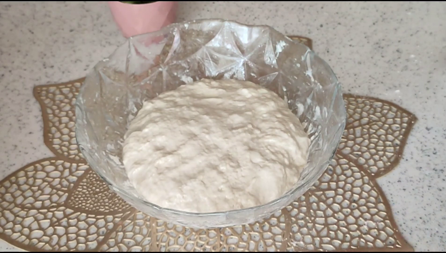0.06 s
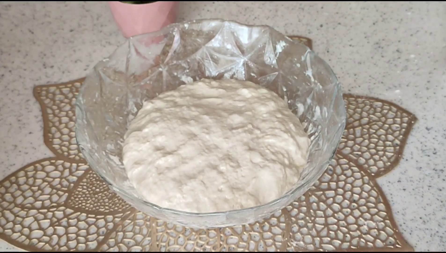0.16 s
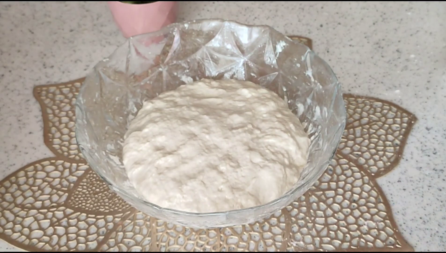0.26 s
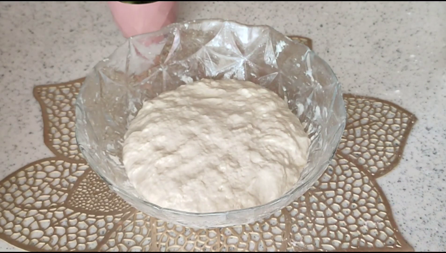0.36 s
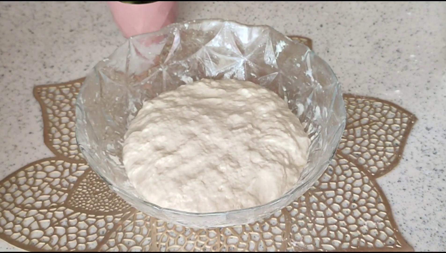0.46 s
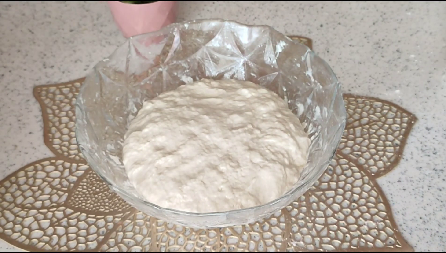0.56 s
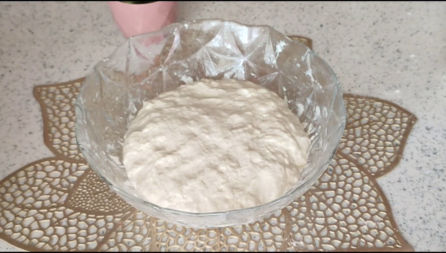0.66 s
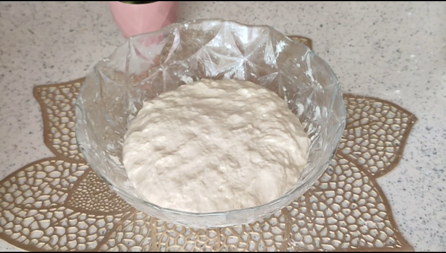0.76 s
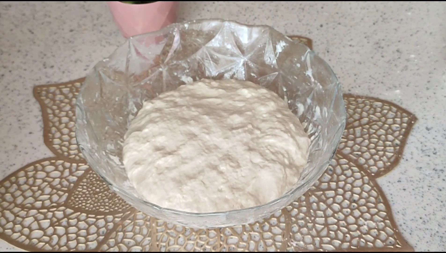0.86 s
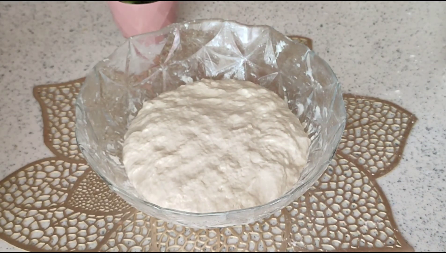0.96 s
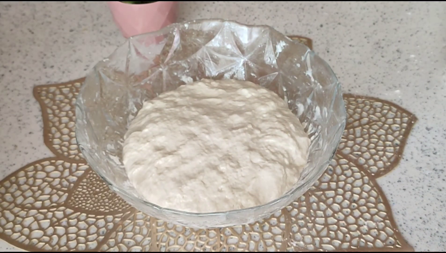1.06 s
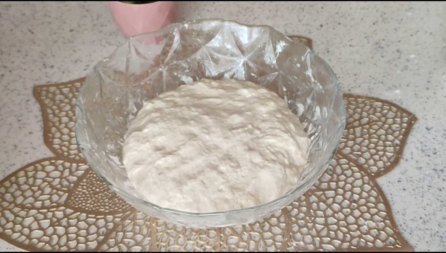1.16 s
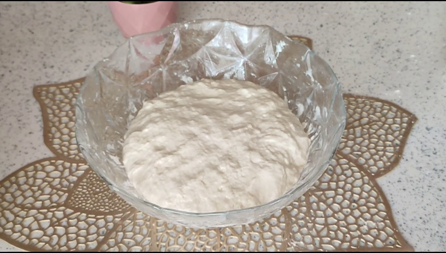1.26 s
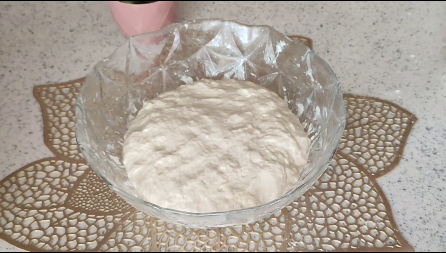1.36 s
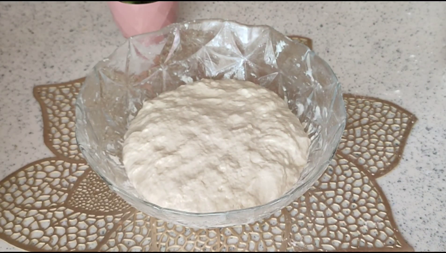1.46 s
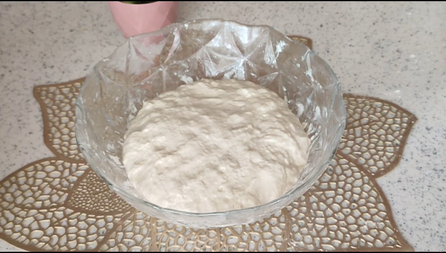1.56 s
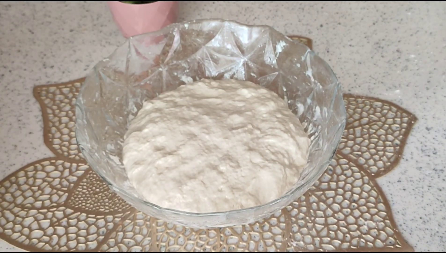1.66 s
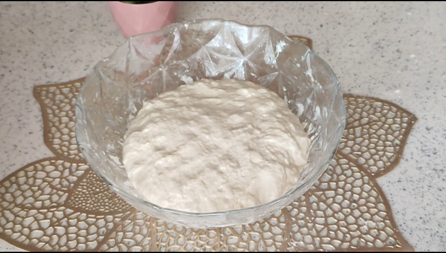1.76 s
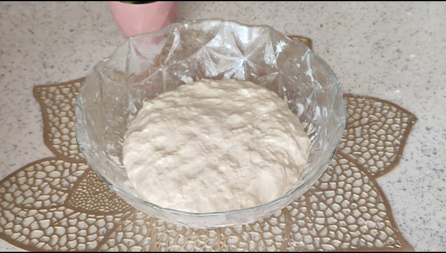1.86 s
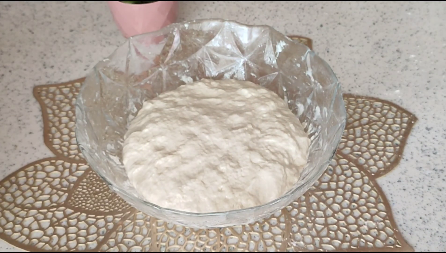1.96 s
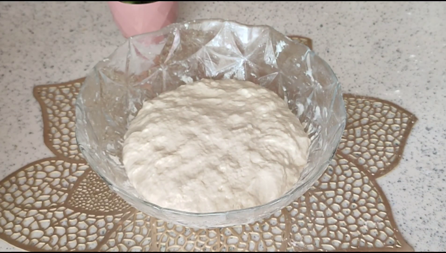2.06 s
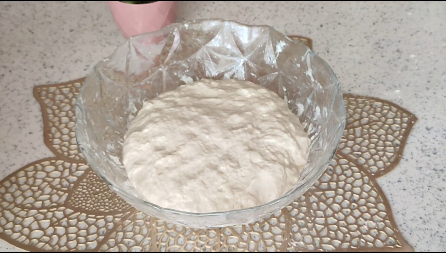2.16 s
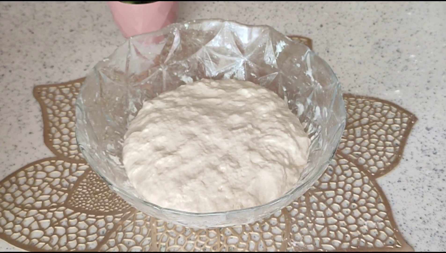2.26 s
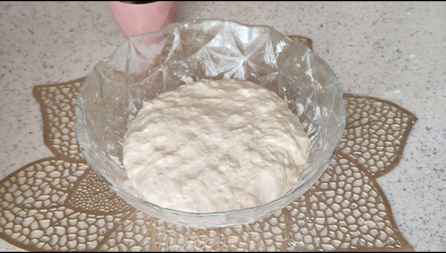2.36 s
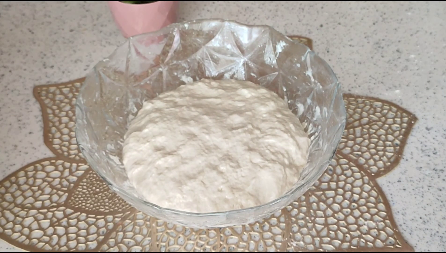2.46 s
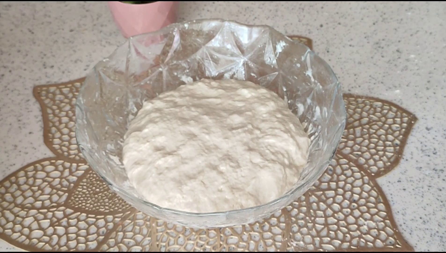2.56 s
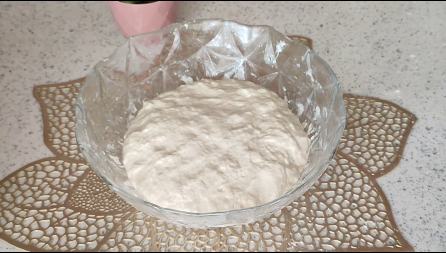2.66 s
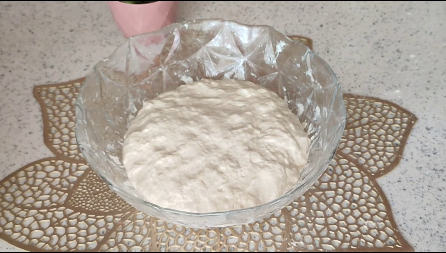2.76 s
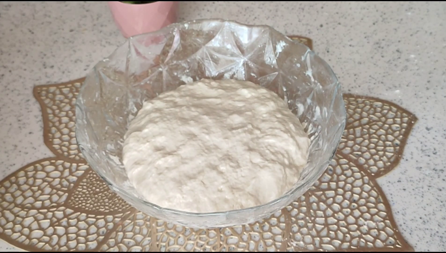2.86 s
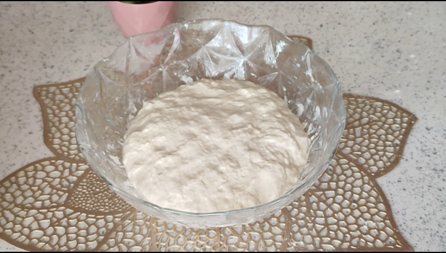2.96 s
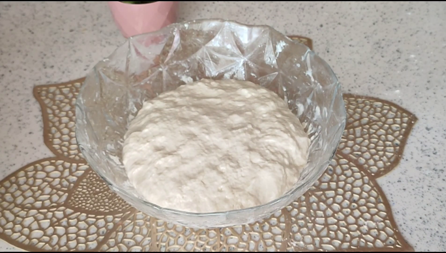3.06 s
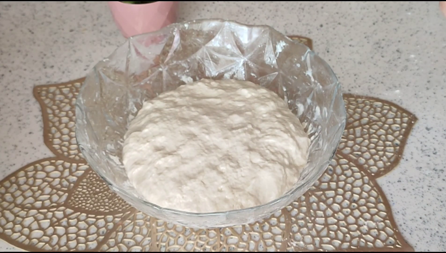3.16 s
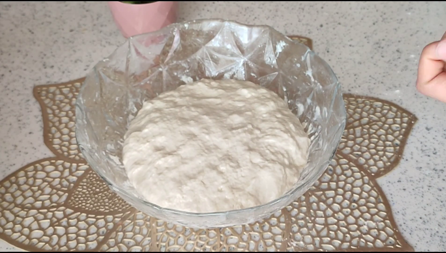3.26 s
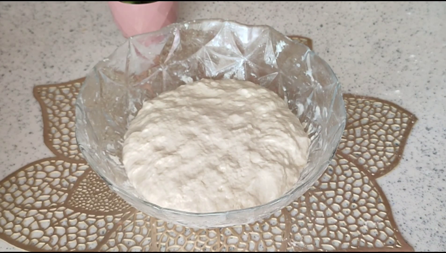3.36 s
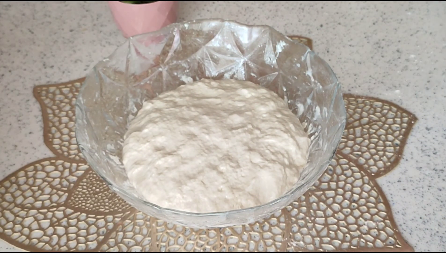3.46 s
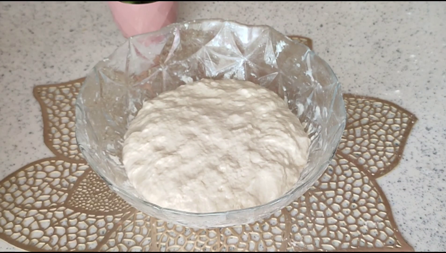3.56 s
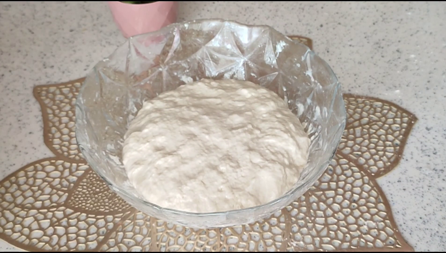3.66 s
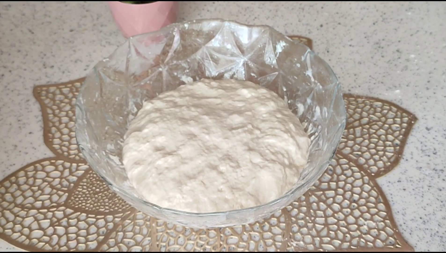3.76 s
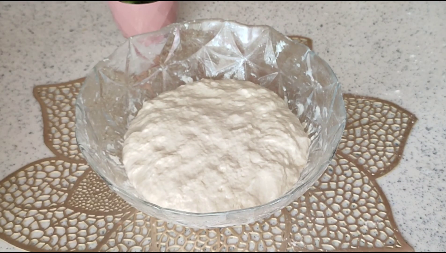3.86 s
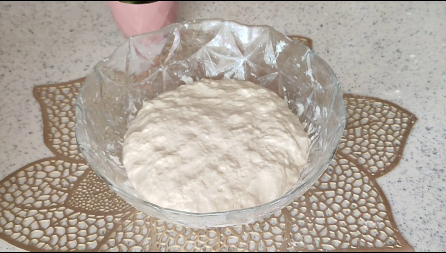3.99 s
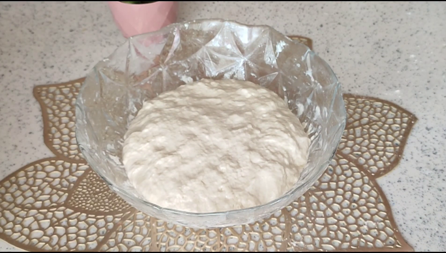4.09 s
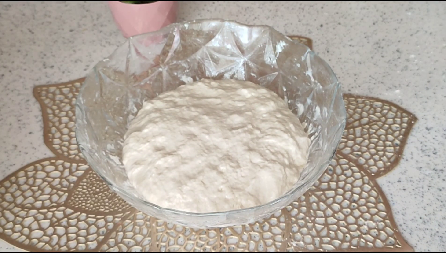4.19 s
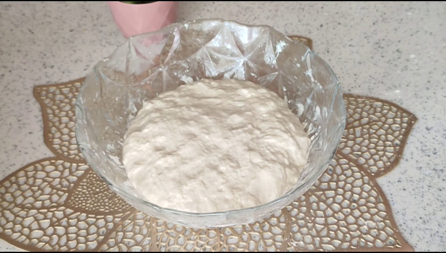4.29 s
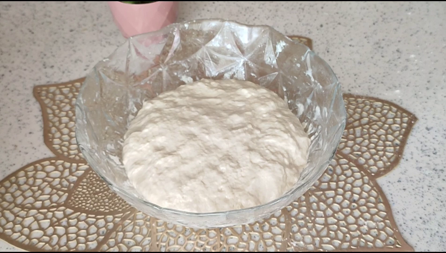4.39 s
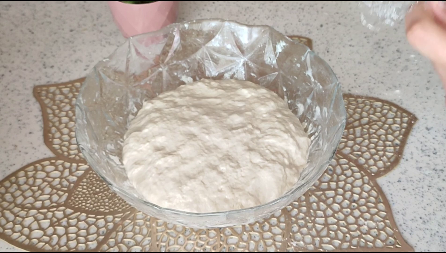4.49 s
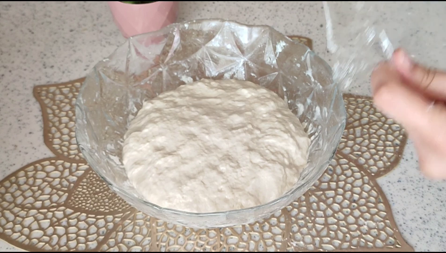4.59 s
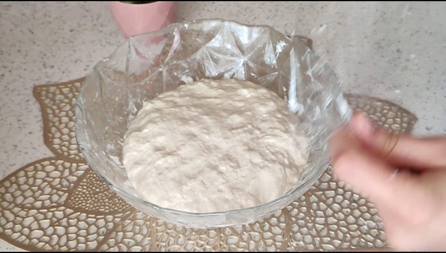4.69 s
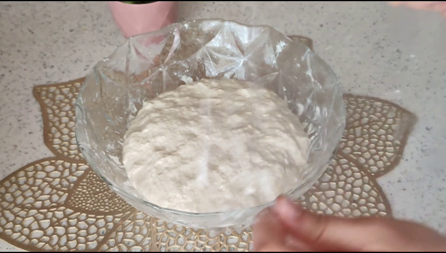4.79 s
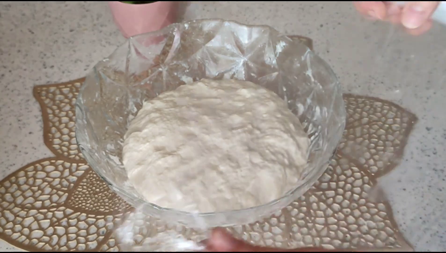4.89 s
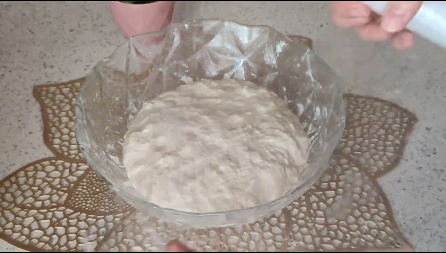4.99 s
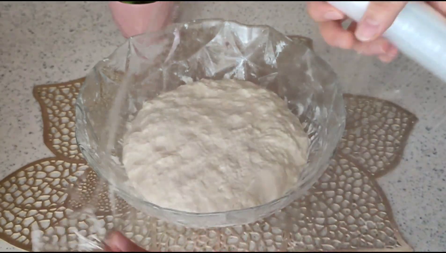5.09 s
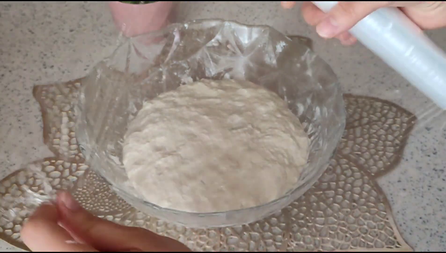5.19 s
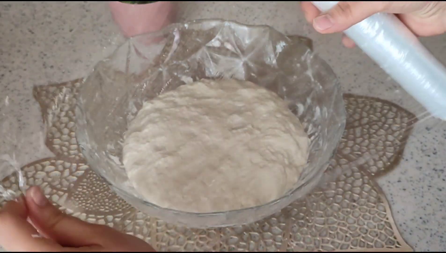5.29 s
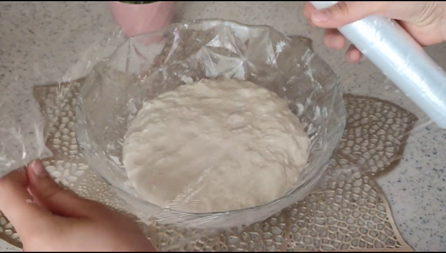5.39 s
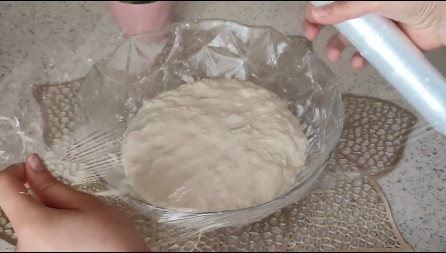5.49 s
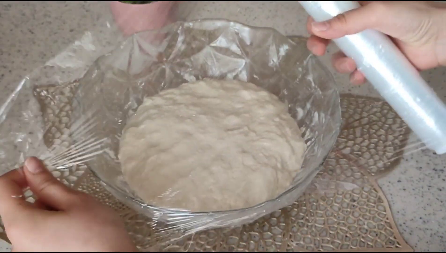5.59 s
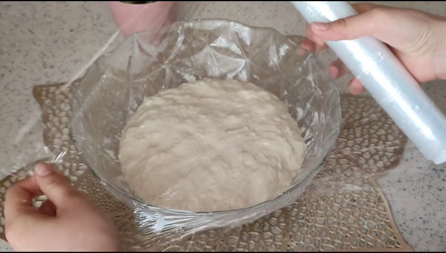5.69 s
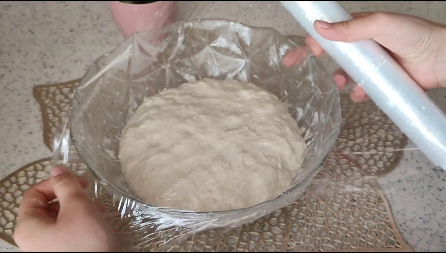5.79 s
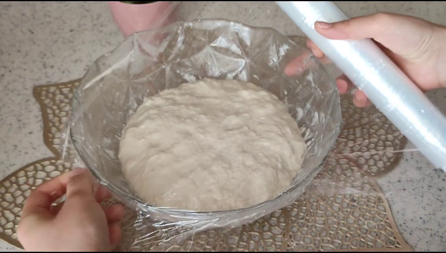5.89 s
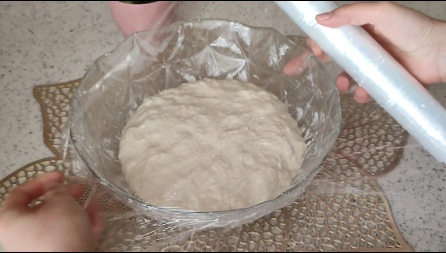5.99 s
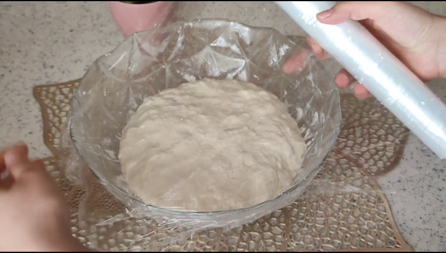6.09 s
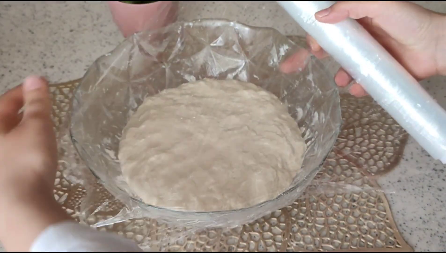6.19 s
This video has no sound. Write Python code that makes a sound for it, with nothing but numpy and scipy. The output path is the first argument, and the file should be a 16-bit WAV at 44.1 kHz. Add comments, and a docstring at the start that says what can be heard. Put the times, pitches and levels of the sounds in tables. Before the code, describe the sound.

After faint ticks and finger rubbing, cling film peels off a roll in loud, crackling pulls close by, over a low kitchen hum.

```python
"""Cling film, picked loose from its roll and drawn over a glass bowl; stereo pair in a quiet kitchen.
It starts off to the right and moves in close, above the bowl. The peeling edge lets go in thousands of
tiny snaps a second, which the taut sheet radiates; at times it rips, judders or pops. Fingers rub and
squeak, creases tick, the roll shudders in the hand, and the touched bowl rings once.
Behind it are short room echoes, a low rumble and the hum of an appliance."""
import sys
import numpy as np
from scipy import signal
from scipy.fft import rfft, irfft, next_fast_len
from scipy.io import wavfile
from scipy.ndimage import uniform_filter1d

SR = 44100
rng = np.random.default_rng(int(sys.argv[2]) if len(sys.argv) > 2 else 0)


def wav_record(signal):
    """Record a signal, one row per channel, as 16-bit PCM in the file named by sys.argv[1]."""
    frames = np.transpose(np.atleast_2d(signal))
    bounded = np.clip(frames, -1, 1)
    # unit amplitude maps onto the largest positive 16-bit level
    quanta = np.round(bounded * 32767).astype(np.int16)
    wavfile.write(sys.argv[1], SR, quanta)


N = 274962
TIME = np.arange(N) / SR

# Room tone spectrum: f/Hz, gain/dB
ROOM_TONE = [(12, -0.5), (28, -3), (55, -6.5), (76, -14), (104, -9.5), (128, -16.5), (166, -14.5),
             (205, -17), (320, -21), (450, -25.5), (740, -28.5), (920, -34), (1800, -36.5), (4600, -45),
             (9600, -50), (11500, -56)]
# Stereo width of the room tone: f/Hz, side minus mid/dB
ROOM_TONE_WIDTH = [(60, -10.5), (110, -16.5), (190, -11.5), (350, -7.5), (630, -3.5), (1130, -1),
                   (2040, -3.5), (3680, -2.5), (6620, -2.5), (11900, -2)]
# Appliance hum: f/Hz, level/dB
HUM = [(101, -59), (167, -67)]
# Kitchen reverberation: f/Hz, T60/s
KITCHEN_T60 = [(200, 0.94), (530, 0.32), (1400, 0.31), (3700, 0.27), (9700, 0.16)]
# Colour difference between the microphones: f/Hz, left minus right/dB
MIC_BALANCE = [(150, 0), (300, 0.5), (480, -6), (800, 1), (1500, 0), (3500, -0.3), (5500, -1), (7500, -4),
               (8800, 2), (11000, 0)]
# The film's path, from the right of the table (0) towards the microphones (1): t/s, nearness
NEARNESS = [(0, 0), (3.3, 0.3), (4.1, 0.41), (4.5, 0.73), (5.5, 0.66)]
# Stereo width of the film and its echoes: f/Hz, side minus mid/dB
FILM_WIDTH = [(150, -14.5), (300, -28), (500, -8.5), (750, -4.5), (1200, -2.5), (1600, -0.5), (11000, 1)]

# Modes of the glass bowl: f/Hz, gain/dB, T60/s
GLASS_MODES = [(894, 1, 0.15), (2380, -5, .07), (4360, 2.5, 0.066), (5540, -4, 0.052)]
# Air resonances in the bowl, under the sheet: f/Hz, bandwidth/Hz, gain/dB
BOWL_AIR = [(268, 6.3, 3.5), (310, 110, -5), (492, 10, 0), (661, 170, -13), (930, 120, -1.5), (1187, 73, 0),
            (1880, 15, 1), (3614, 25, 0.5)]
# Spectrum of a flipping crease: f/Hz, gain/dB
CREASE_COLOUR = [(600, -2), (1500, -7), (3000, -3), (4600, -3), (6000, 1.5), (8000, -4), (10500, -9.5),
                 (12000, -28)]
# Spectrum of the short flap at the roll: f/Hz, gain/dB
FLAP_COLOUR = [(100, -13), (180, -5.5), (250, -1.5), (370, -8.5), (520, -9.5), (750, -5), (1100, -5.5),
               (1750, -6.5), (2450, -2), (3100, -7), (3900, -4.5), (5200, -6), (7300, -3), (10000, -6.5),
               (12000, -21.5)]
# Spectrum of the wide sheet: f/Hz, gain/dB
SHEET_COLOUR = [(100, -1), (160, 1), (260, -6.5), (360, -4.5), (450, 1.5), (800, 1), (1050, -3),
                (1450, 1.5), (2400, -6), (3200, -8.5), (5200, -7), (7400, -5), (8800, -14.5), (10600, -8.5),
                (12000, -22.5)]

# Event levels below are relative, taken before the room and the microphones.
# A hand touches the bowl: t/s, level/dB
TOUCHES = [(5.955, -52.5)]
# Faint rising finger squeaks: middle t/s, length/s, f/Hz, level/dB
SQUEAKS = [(.205, 0.076, 1480, -61.5), (.27, .13, 1730, -65)]
# Low shudders of the roll and the hands on it: middle t/s, length/s, f/Hz, level/dB
SHUDDERS = [(2.54, .083, 170.5, -41), (4.18, .06, 134, -39.5), (4.265, 0.0873, 103.2, -34),
            (4.345, 0.1, 109, -42.5), (4.45, 0.095, 125.3, -42), (4.61, 0.057, 93, -50),
            (5.275, 0.09, 160.7, -36.5), (5.36, 0.14, 158, -40), (5.64, .11, 77, -45.5),
            (5.9, .44, 58.4, -52.5)]
# Judders and rasps of the sheet: middle t/s, length/s, f/Hz, level/dB
JUDDERS = [(1.895, .06, 960, -49), (3.311, .02, 1390, -45), (4.11, .054, 936, -32),
           (4.522, .05, 466, -33.5), (4.577, .032, 530, -25.5), (4.597, .028, 1410, -33),
           (4.6, 0.041, 262, -38), (4.65, 0.08, 314, -35.5), (4.661, .032, 680, -28.5),
           (4.78, .057, 797, -32.5), (4.974, 0.063, 438, -24.5), (5.005, 0.051, 322, -45.5),
           (5.015, .044, 729.5, -27.5), (5.165, .061, 5300, -32), (5.425, .055, 4230, -29),
           (5.447, .042, 302, -29), (5.463, 0.08, 507, -25), (5.53, .095, 278.6, -36.5)]
# Creases flip over: t/s, level/dB
TICKS = [(0.4913, -23.5), (0.918, -32), (0.9646, -32), (1.1376, -29), (1.2, -25), (1.259, -29.5),
         (1.286, -27.5), (5.954, -26)]
# Stuck patches rip free: t/s, level/dB
RIPS = [(2.501, -19), (3.2255, -31), (3.277, -24), (3.301, -26), (3.3075, -19.5), (4.171, -21),
        (4.3803, -11.5), (4.901, -18), (5.1355, -18), (5.244, -11.5), (5.2797, -20), (5.3225, -14),
        (5.5972, -12), (5.9184, -32.5), (6.1225, -35.5)]
# Wide strips let go at once: t/s, level/dB
POPS = [(4.253, -15), (4.587, -11), (5.447, -18), (5.461, -14.5), (5.491, -12), (5.639, -14),
        (5.666, -11.5)]
# Fingers rub over the film: middle t/s, length/s, level/dB
RUBS = [(1.644, 0.27, -72), (1.777, 0.093, -58), (1.885, 0.095, -47.5), (1.925, 0.42, -65),
        (2.089, 0.19, -64.5), (2.323, 0.61, -64), (2.477, 0.44, -58.5), (2.566, 0.14, -51),
        (2.654, .28, -61), (3.152, 0.14, -51.5), (3.208, 0.59, -62), (3.293, .08, -55.5),
        (3.496, 0.18, -66.5), (3.61, 0.15, -65), (3.768, 0.096, -62.5), (3.883, 0.57, -65.5),
        (5.913, 0.088, -59), (6.03, 0.71, -69.5), (6.131, 0.017, -62)]
# The slack sheet rustles around the pulls: start t/s, end t/s, level/dB
SLACK = [(4.054, 4.904, -48.5), (4.867, 5.114, -50.5), (5.135, 5.785, -48.5)]
# Pulls off the roll: start t/s, end t/s, attack/s, edge level/dB, creases re edge/dB, sheet re edge/dB
PULLS = [(2.498, 2.56, 0.022, -34, 0.5, -1.5), (4.043, 4.117, 0.012, -41, 5, -7),
         (4.09, 4.152, 0.018, -30, 1.5, -10), (4.162, 4.349, .003, -30.5, 0.55, -1),
         (4.377, 4.452, 0.0024, -31, 1.5, -6.5), (4.441, 4.554, 0.015, -28.5, 1.5, 2.5),
         (4.56, 4.679, 0.0082, -30, 2, .5), (4.716, 4.855, 0.015, -38.5, 5.5, 5.5),
         (4.925, 5.059, 0.045, -32.5, 3, 3.5), (5.134, 5.213, 0.0029, -32.5, 1, 3.5),
         (5.246, 5.291, 0.0048, -32, -0.5, 4), (5.319, 5.435, .006, -32, 1.5, 4.5),
         (5.399, 5.547, 0.044, -30, -0.5, 0.5), (5.602, 5.713, 0.0032, -33.5, 3, 6.5)]


def from_db(db):
    """Decibels to gain."""
    return 10 ** (np.asarray(db) / 20)


def at_hz(points, hz):
    """Read a table on a log-frequency axis."""
    freq, value = np.transpose(points)
    return np.interp(np.log(np.maximum(hz, 1)), np.log(np.maximum(freq, 1)), value)


def band(x, low_hz, high_hz, order=3):
    """Butterworth band-pass."""
    return signal.sosfilt(signal.butter(order, [low_hz, high_hz], "band", fs=SR, output="sos"), x + 1e-18)


def colour(x, points):
    """Minimum-phase filter that follows a table of f/Hz, gain/dB."""
    size = 2 * next_fast_len(N // 2 + SR // 10)
    gain = from_db(at_hz(points, np.fft.rfftfreq(size, 1 / SR)))
    cepstrum = irfft(np.log(gain))
    cepstrum[1:size // 2] *= 2
    cepstrum[size // 2 + 1:] = 0
    return irfft(rfft(x, size) * np.exp(rfft(cepstrum)))[..., :N]


def resonance(x, hz, width_hz):
    """Two-pole resonance with a peak gain of 1."""
    radius = np.exp(-np.pi * width_hz / SR)
    feedback = [1, -2 * radius * np.cos(2 * np.pi * hz / SR), radius ** 2]
    return signal.lfilter(np.array([1, 0, -1]) * (1 - radius ** 2) / 2, feedback, x + 1e-18)


def drift(per_s, time=TIME):
    """Smooth random wandering with spread 1."""
    knots = rng.standard_normal(N // 10)
    return np.interp(time * per_s, np.arange(len(knots)), knots) * np.sqrt(3 / 2)


def spread(pair, width):
    """Left and right from a mid and a side signal, the side shaped by the width table."""
    return pair[0] + colour(pair[1], width) * [[1], [-1]]


def steady(x, span_s):
    """Even out the slow swells of a stereo texture and keep its grain; the mid has power 1."""
    power = uniform_filter1d(x.mean(0) ** 2, int(span_s * SR))
    return x / np.sqrt(np.maximum(power, 0) + 1e-20)


def clicks(rows):
    """One impulse for each row of t/s, level/dB."""
    times, db = np.transpose(rows)
    return np.bincount((times * SR).astype(int), from_db(db), N)[:N]


def arch(start_s, end_s):
    """Half a sine from start to end, zero outside."""
    return np.sin(np.pi * np.clip((TIME - start_s) / (end_s - start_s), 0, 1))


def held(start_s, end_s, attack_s, fade_db_per_s):
    """Attack, hold, and a steady decay after the end."""
    attack = np.clip((TIME - start_s) / attack_s, 0, 1)
    return attack * from_db(-fade_db_per_s * np.clip(TIME - end_s, 0, 1))


def room_tone(level_db=-51.5):
    """The low rumble of the quiet kitchen."""
    air = colour(spread(rng.standard_normal((2, N)), ROOM_TONE_WIDTH), ROOM_TONE)
    return from_db(level_db) * air / np.sqrt(np.mean(air ** 2))


def appliance(waver=0.19):
    """A background hum, centred between the microphones, wavering in phase and level."""
    hum = 0
    for hz, db in HUM:
        tone = np.sqrt(2) * np.sin(2 * np.pi * hz * TIME + waver * drift(5.2))
        hum = hum + from_db(db) * tone * (1 + waver * drift(6.1))
    return hum


def kitchen(direct, nearness, wet_db=-13, far_db=5.5, gap_s=0.0016):
    """A small hard room adds diffuse echoes: duller as they die, stronger when the film is far off."""
    age = np.arange(SR // 2) / SR
    edges_hz = np.geomspace(90, 14000, num=8)
    tail = 0
    for low, high in zip(edges_hz, edges_hz[1:]):
        decay = from_db(-60 * age / at_hz(KITCHEN_T60, np.sqrt(low * high)))
        tail = tail + band(rng.standard_normal((2, len(age))), low, high, order=2) * decay
    tail *= np.clip(age / gap_s - 1, 0, 1)
    tail /= np.sqrt(np.sum(tail ** 2))
    send = direct * from_db(wet_db + far_db * (1 - nearness))
    echoes = signal.fftconvolve(send, tail, axes=1)[:, :N]
    return direct + spread(echoes, FILM_WIDTH)


def microphones(pair, nearness, lag_s=0.00014, off_centre_db=2.5):
    """Sound from the right reaches the left microphone later and weaker; each has its own colour."""
    aside = 1 - nearness
    left = np.interp(TIME - lag_s * aside, TIME, pair[0]) * from_db(-off_centre_db * aside / 2)
    right = pair[1] * from_db(off_centre_db * aside / 2)
    return np.array([colour(left, [(hz, db / 2) for hz, db in MIC_BALANCE]),
                     colour(right, [(hz, -db / 2) for hz, db in MIC_BALANCE])])


def glass_bowl():
    """The touched bowl rings lightly, damped by the dough inside."""
    age = np.arange(SR // 2) / SR
    ring = sum(from_db(db - 60 * age / t60) * np.sin(2 * np.pi * hz * age) for hz, db, t60 in GLASS_MODES)
    return signal.fftconvolve(clicks(TOUCHES), ring)[:N]


def stick_slip(rows, glide_octaves, jitter, overtone_db, rough_db, jitter_cycles=1.6):
    """The film grips and slips almost regularly: short swelling tones that glide as tension changes."""
    out = np.zeros(N)
    for middle, length, hz, db in rows:
        on = np.abs(TIME - middle) < length / 2
        age = TIME[on] - middle + length / 2
        wander = 1 + jitter * drift(hz / jitter_cycles, age)
        grip = from_db(db + rough_db * drift(hz / 4, age))
        glide = 2 ** (glide_octaves * (age / length - 0.5))
        phase = 2 * np.pi * np.cumsum(hz * glide * wander) / SR
        wave = np.sin(phase) + from_db(overtone_db) * np.sin(2 * phase)
        out[on] += grip * np.sin(np.pi * age / length) * wave
    return out


def cracks(rows, spectrum, gain_db, shiver_s, shiver_db):
    """Film gives way with a sharp tick and a few milliseconds of shiver."""
    age = np.arange(SR // 10) / SR
    crack = from_db(shiver_db) * rng.standard_normal((2, len(age))) * np.exp(-age / shiver_s)
    crack[:, 0] = 1  # the tick
    train = signal.fftconvolve(clicks(rows)[None], crack, axes=1)[:, :N]
    return from_db(gain_db) * colour(train, spectrum)


def pops(hz=680, width_hz=800, gain_db=24):
    """A strip that lets go jerks the taut sheet through one heavily damped swing."""
    swing = resonance(clicks(POPS), hz, width_hz)
    return from_db(gain_db) * resonance(swing, hz, 2 * width_hz)


def handling(swell_db=3.5):
    """How hard the hands drive edge, creases and sheet; pulls, slack rustle and rubs add in power."""
    def shares(envelope, creases_db, sheet_db):
        return np.outer(from_db([0, creases_db, sheet_db]), envelope) ** 2

    power = np.zeros((3, N))
    for start, end, attack_s, db, creases_db, sheet_db in PULLS:
        # a pull swells as the arm speeds up and dies away when it stops
        swell = from_db(db + swell_db * (arch(start, end) - 1))
        power += shares(swell * held(start, end, attack_s, fade_db_per_s=520), creases_db, sheet_db)
    for start, end, db in SLACK:
        rustle = from_db(db) * held(start, end, attack_s=0.021, fade_db_per_s=230)
        power += shares(rustle, creases_db=3.5, sheet_db=6.5)
    for middle, length, db in RUBS:
        stroke = from_db(db) * arch(middle - length / 2, middle + length / 2) ** 2
        power += shares(stroke, creases_db=-3, sheet_db=-4.5)
    return np.sqrt(power)


def wrinkles(crackle, q=16, flare_db=6.5, flare_per_s=40, gain_db=-6.5):
    """Wrinkles form and flatten as the tension shifts; each rings for a moment at its own pitch."""
    out = crackle
    for hz in np.geomspace(400, 10000, num=30):
        flare = from_db(gain_db + flare_db * np.minimum(drift(flare_per_s), 2))
        out = out + flare * resonance(crackle, hz, hz / q)
    return out


def snaps(per_s, uneven_db=1.0):
    """Random snaps of uneven size; each reaches the two microphones in its own way."""
    chance = np.clip(per_s / SR, 1e-4, 1)
    sizes = from_db(uneven_db * np.minimum(rng.exponential(1, N), 4))
    impulses = sizes * (rng.random(N) < chance) / np.sqrt(chance)
    return spread(impulses * rng.choice([-1, 1], (2, N)), FILM_WIDTH)


def peeling(nearness, top_snaps_per_s=6000, catch_db=0.5, catch_per_s=170):
    """A faster pull frees more snaps a second; edge, creases and sheet radiate them, treble to bass."""
    edge, creases, sheet = handling()
    snapping = snaps(top_snaps_per_s * (edge / edge.max()) ** 0.27)
    catching = from_db(catch_db * drift(catch_per_s))  # the edge catches and runs on
    crackle = wrinkles(snapping * catching)
    # the flap at the roll sounds thin; the wide sheet is fuller and rings the air in the bowl
    flap = colour(crackle, FLAP_COLOUR)
    wide = colour(crackle, SHEET_COLOUR)
    bowl_air = sum(from_db(db) * resonance(wide, hz, width) for hz, width, db in BOWL_AIR)
    film = (1 - nearness) * flap + nearness * (wide + bowl_air)
    sizzle = from_db(-1.2) * edge * steady(band(film, 3260, 11700), span_s=0.13)
    rustle = from_db(-0.42) * creases * steady(band(film, 850, 3390), span_s=0.027)
    drumming = from_db(-3.5) * sheet * steady(band(film, 156, 1000), span_s=0.075)
    return sizzle + rustle + drumming


def scene():
    """The film is picked loose to the right of the microphones, then drawn closer, over the bowl."""
    nearness = np.interp(TIME, *np.transpose(NEARNESS))
    direct = peeling(nearness) + pops() + glass_bowl()
    direct += cracks(TICKS, CREASE_COLOUR, gain_db=-1, shiver_s=0.0044, shiver_db=-18.5)
    direct += cracks(RIPS, FLAP_COLOUR, gain_db=6.5, shiver_s=0.0037, shiver_db=-13)
    direct += stick_slip(JUDDERS, glide_octaves=-0.069, jitter=0.072, overtone_db=-7, rough_db=2)
    direct += stick_slip(SHUDDERS, glide_octaves=-0.0015, jitter=0.08, overtone_db=-29, rough_db=4.5)
    direct += stick_slip(SQUEAKS, glide_octaves=0.216, jitter=0.058, overtone_db=-10, rough_db=4)
    return microphones(kitchen(direct, nearness), nearness) + room_tone() + appliance()


def record(dry):
    """A steep low-pass cuts the treble above 11.7 kHz."""
    return signal.sosfilt(signal.ellip(10, 0.2, 80, 11700, fs=SR, output="sos"), dry)


dry = scene()
out = record(dry)
wav_record(out)
```